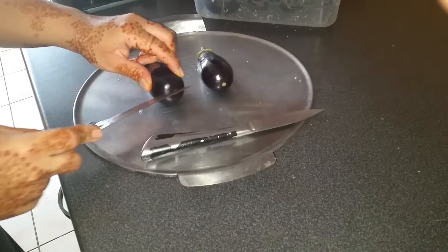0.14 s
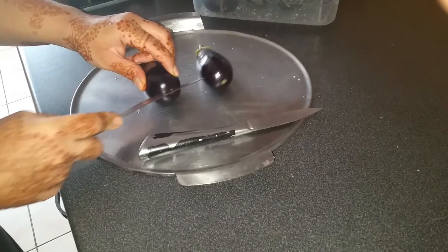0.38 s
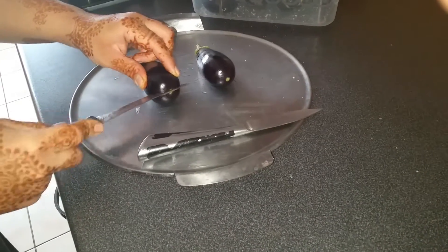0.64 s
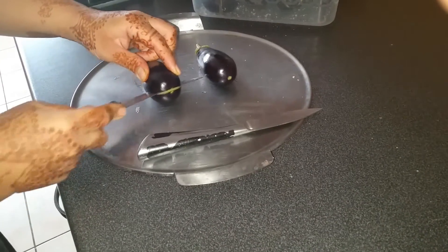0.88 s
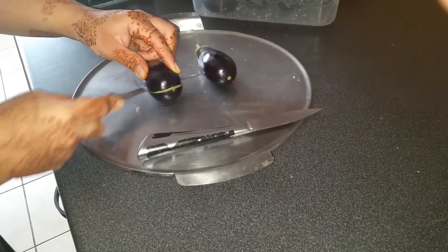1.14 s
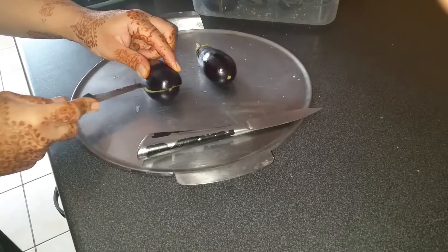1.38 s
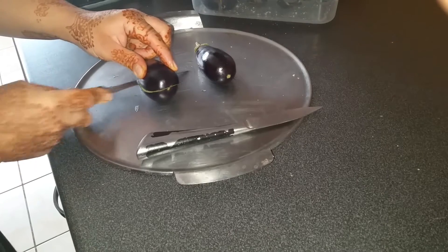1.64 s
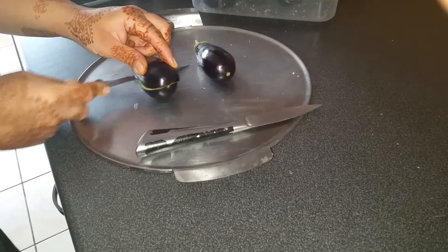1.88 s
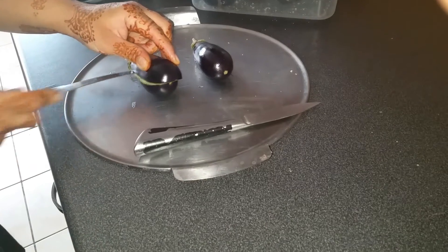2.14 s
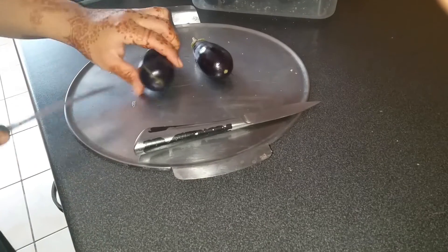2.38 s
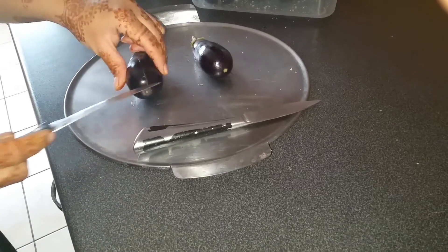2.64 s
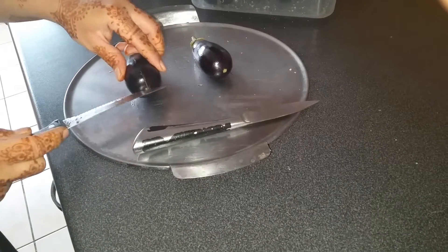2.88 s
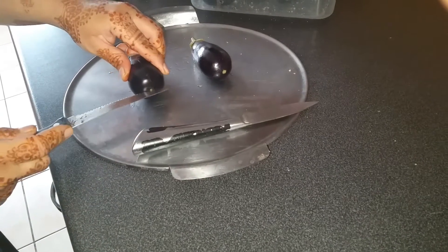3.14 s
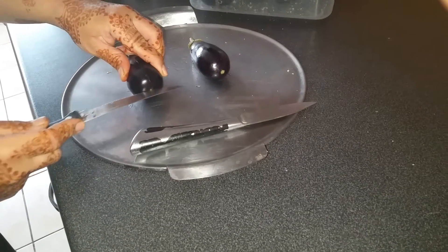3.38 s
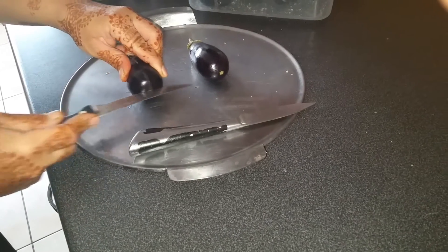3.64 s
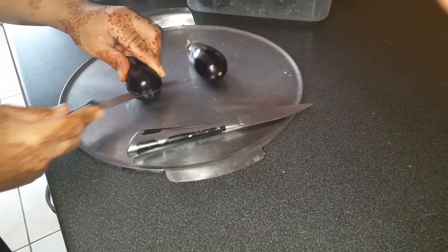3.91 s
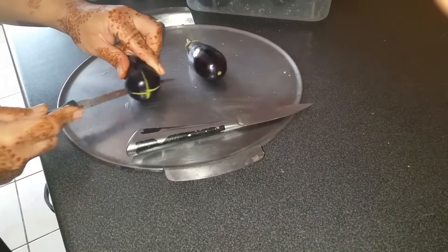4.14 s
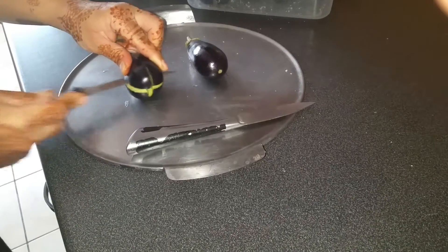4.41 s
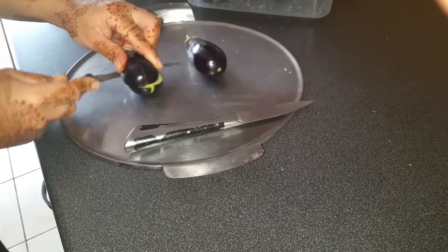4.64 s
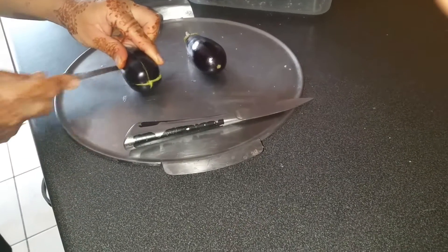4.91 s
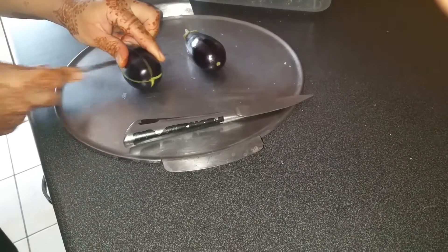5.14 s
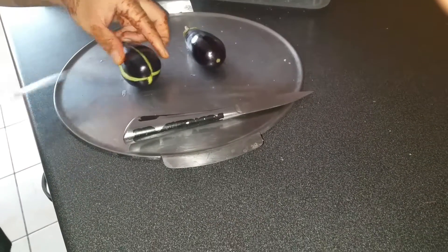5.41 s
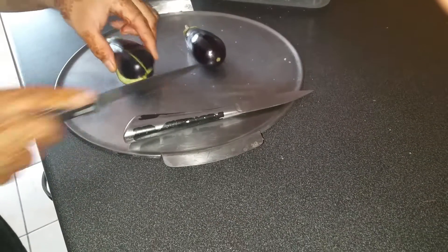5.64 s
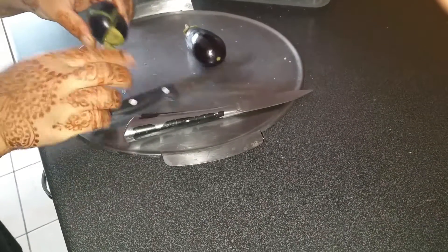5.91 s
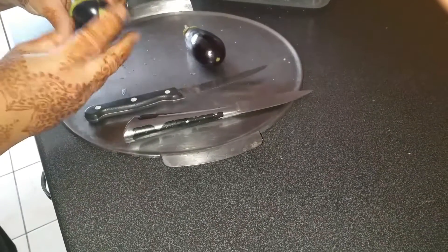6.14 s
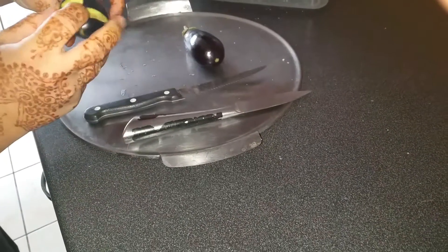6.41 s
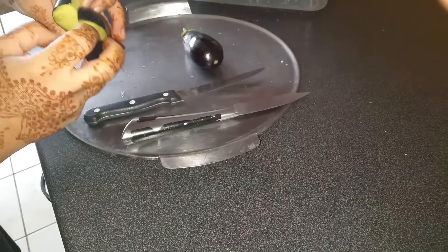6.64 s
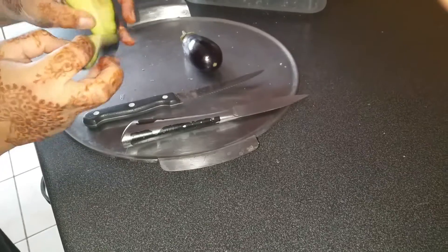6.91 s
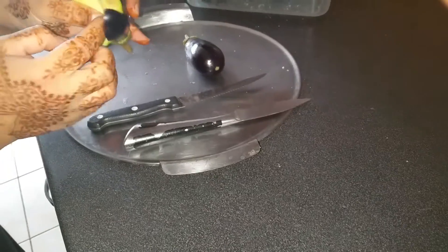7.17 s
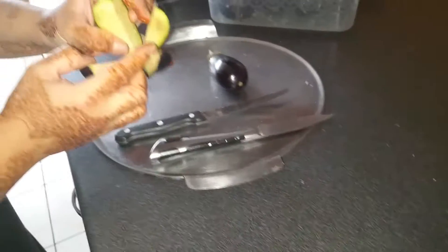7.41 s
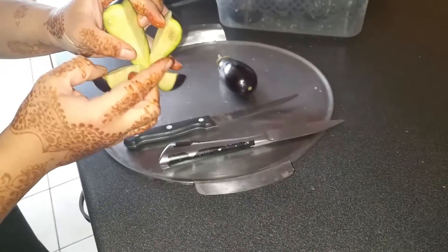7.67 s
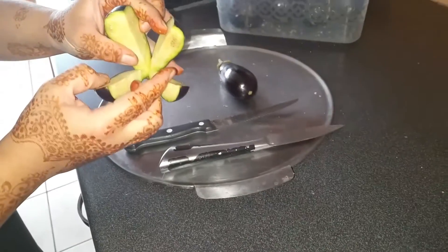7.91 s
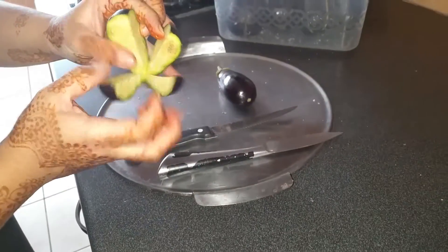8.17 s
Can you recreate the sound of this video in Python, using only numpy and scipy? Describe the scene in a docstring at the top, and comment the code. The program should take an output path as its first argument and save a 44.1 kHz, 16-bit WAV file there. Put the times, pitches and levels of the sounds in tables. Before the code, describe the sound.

Close in a quiet kitchen, a knife saws a small aubergine on a steel tray: quick alternating strokes, crackly and moist, with dull counter thumps. A short pause with a soft pop and rubbing fingers follows, then a second bout opens with loud snaps and saws on. The knife is dropped with a rapid bouncing metal clatter, leaving faint handling taps over low room tone and thin high buzzing.

```python
"""A knife saws twice through a small aubergine on a steel tray on a kitchen counter, then drops on the tray.
Each stroke is a crackle of clicks from tearing skin and flesh; short noisy blows make the snaps and clatter.
Soft presses ring the counter's low modes, some as a stroke ends; damped waves make taps and pops, some dry,
some ringing on in tray and room. Behind lie room tone made of noise, a low hum, tiny high ticks, and a faint
buzz of pulses and fuzzy noise."""
import sys
import numpy as np
from scipy import signal
from scipy.fft import rfft, irfft, next_fast_len
from scipy.io import wavfile
from scipy.ndimage import uniform_filter1d

SR = 44100
rng = np.random.default_rng(int(sys.argv[2]) if len(sys.argv) > 2 else 0)


def boost_factor(decibels):
    """Convert a level in decibels to a linear amplitude factor."""
    exponent = np.asarray(decibels, float) / 20
    return 10 ** exponent


def dump(signal):
    """Clip the signal to [-1, 1] and save it as 16-bit WAV at the path in sys.argv[1]."""
    limited = np.clip(np.atleast_2d(signal).T, -1, 1)
    pcm = np.round(limited * 32767).astype(np.int16)
    wavfile.write(sys.argv[1], SR, pcm)


N = 365588

# Room tone. Each row: frequency in Hz, relative level in dB per Hz.
AIR_COLOUR = [(22, -30), (38, 1.5), (49, -7), (124, -2), (291, -11.5), (348, -13), (1110, -17), (2600, -22),
              (4190, -25.5), (5670, -21), (7660, -24.5), (9140, -27.5), (9860, -27), (14400, -31.5),
              (15300, -32), (15800, -55)]
# How alike the room tone is on both sides. Each row: frequency in Hz, likeness (1 = same).
AIR_LIKENESS = [(60, 0.58), (240, 0.65), (950, 0.067), (3770, 0), (15000, 0)]
# Balance of the room tone. Each row: frequency in Hz, left over right in dB.
AIR_BALANCE = [(60, -5), (240, 1.5), (950, -1.0), (3770, -6), (15000, -7.5)]
# Hum without the knife. Each row: time in seconds, level in dB.
HUM_LEVEL = [(0, -86), (7.3, -88), (7.7, -75), (8.29, -66)]
# Colour of the buzz. Each row: centre in Hz, width in Hz, relative level in dB.
BUZZ_BANDS = [(5710, 700, 8.5), (5560, 270, -4.5), (8000, 650, -1.5)]
# Fuzzy part of the buzz. Each row: time in seconds, level in dB before the bursts shape it.
FUZZ_LEVEL = [(0, -78), (.7, -68), (2.4, -70), (3.1, -74), (3.25, -71), (5.4, -71), (6.4, -80), (8.29, -75)]
# Clear pulses of the buzz. Each row: time in seconds, level in dB before bursts and left-right balance.
PULSE_LEVEL = [(0, -81), (2.4, -72.5), (3.1, -85), (3.2, -74), (4.6, -73.5), (4.8, -103)]
# The pace of the bursts changes in steps. Each row: from this time in seconds, bursts a second.
BURST_PACE = [(0, 8.475), (2.36, 10), (2.76, 7.143), (3.18, 5.77), (3.7, 6.5)]
# Blade strokes, push and pull by turns. Each row: start in seconds, length in seconds,
# crackle in dB before colouring, body (low part) in dB against the crackle.
STROKES = [(0.161, 0.072, -57.5, -1), (0.354, .21, -52.5, 4), (0.631, 0.071, -49, 3.5),
           (0.777, 0.15, -48.5, 4.5), (1.011, .068, -49, 5.5), (1.149, 0.12, -45, -1),
           (1.375, 0.063, -46, 1.5), (1.511, 0.14, -47, 4), (1.761, 0.062, -46.5, 0),
           (1.922, 0.081, -42, -5), (2.118, 0.12, -48.5, -5), (3.606, 0.087, -59, 0),
           (3.788, 0.068, -50, -4), (3.959, .085, -43.5, 2.5), (4.146, 0.06, -44.5, 2),
           (4.282, .12, -48, 6), (4.489, 0.063, -43, -7.5), (4.624, 0.12, -47.5, 5.5),
           (4.843, 0.083, -44.5, -13), (4.986, 0.14, -47, -0.5), (5.232, 0.11, -44.5, -4.5)]
# Fingers rub the fruit. Each row: start in seconds, length in seconds, level in dB before colouring.
RUBS = [(2.3, 0.28, -70), (3.38, 0.19, -72.5), (5.616, 0.17, -71.5), (6.485, .03, -74), (6.788, 0.031, -74),
        (8.214, 0.034, -75.5)]
# Loud snaps of skin and fibre. Each row: time in seconds, level in dB before a shared gain,
# body (low part) and edge (high part) in dB against the middle.
SNAPS = [(0.5164, -30, -7, -16), (0.559, -34, 6, 1.5), (0.7337, -34.5, 1, -4), (0.8295, -40, 18, -10),
         (0.8923, -34.5, 22.5, -11), (1.6409, -29.5, -23, 7.5), (3.5838, -43, 4, -2),
         (3.6358, -36.5, -1.5, -17), (3.6957, -38, 3, -14), (3.9714, -31, 10, 8.5), (3.983, -25, -11, -4),
         (3.9914, -18.5, -3, -9), (4.0026, -29, -18, 10), (4.0202, -18.5, 5, 5), (4.076, -40, -10, -20),
         (4.6977, -21, -27, -26)]
# Colour of torn fruit. Each row: frequency in Hz, relative level in dB per Hz.
FRUIT_COLOUR = [(120, -23), (200, -6), (300, -6), (560, -3.5), (760, -5), (950, 1), (1170, -3),
                (1600, -1.3), (2100, 0.5), (2800, -8), (3500, -6.5), (4500, -7), (6500, -13.5),
                (9300, -20.5), (12000, -21), (15500, -36)]
# Clear modes of the tray. Each row: frequency in Hz, relative level in dB, time to fall 60 dB in seconds.
TRAY_MODES = [(590, -6, .25), (840, -6, .15), (980, -5, .15), (1330, -9, .2), (1612, -7, .2),
              (1776, -5, .25), (1960, -2, .2), (2020, -3, .2), (2290, -5, .2), (2454, -4, .2),
              (2834, -7, .2), (3320, -9, .15), (4312, -6, .12), (5224, -6, .08), (5726, -6, .08),
              (7079, -7, .08)]
# Echo of the kitchen. Each row: frequency in Hz, time to fall 60 dB in seconds.
KITCHEN_DECAY = [(100, 0.47), (500, 0.4), (2000, 0.43), (6000, 0.32), (14000, 0.19)]
# How alike the tray and kitchen tails are on both sides. Each row: frequency in Hz, likeness (1 = same).
NEAR_LIKENESS = [(60, 1), (240, 0.95), (950, 0.53), (3770, -0.1), (15000, 0.087)]
# Balance of those tails. Each row: frequency in Hz, left over right in dB.
NEAR_BALANCE = [(60, -22), (180, -6), (550, 3), (1650, -8.5), (4970, -4.5), (15000, 5)]
# The hand presses tray onto counter. Each row: time in seconds (a press starts 6 ms later),
# strength in dB for the lowest modes, extra strength in dB for the upper modes.
PRESSES = [(0.177, -55.5, 20), (0.663, -49, -12), (0.871, -45, -10), (1.029, -65, -10), (1.231, -46, -17),
           (1.4, -44.5, -3), (1.612, -36.5, -12), (2.004, -32, 4.5), (3.417, -59, 10.5), (3.804, -47, 13.5),
           (3.99, -35, -2), (4.397, -31.5, 5.5), (4.745, -29.5, 3), (5.281, -44, -7), (5.86, -55, -4),
           (5.989, -42, 11), (6.081, -42, 14)]
# Low modes of the counter. Each row: frequency in Hz, level in dB before a shared cut,
# time to fall 60 dB in seconds.
COUNTER_MODES = [(59, -20.5, 1), (82.8, -1.5, 0.47), (105.5, -6.5, 0.78), (124.3, -10.5, 0.16),
                 (142.9, -10.5, 0.74), (162.4, -24, 0.23), (175, -14, 0.54), (207, -49, 0.27),
                 (253.4, -13.5, 0.35)]
# Taps and pops of fruit, fingers and handle, some dry, some ringing on in tray and room. Each row:
# start in seconds, level in dB, pitch in Hz, left over right in dB, share sent into the tray in dB.
TAPS = [(2.517, -36, 345, -1, -5), (2.765, -55, 450, 13, -.5), (2.984, -59, 3730, 4, 7),
        (3.447, -47.5, 660, 16, -25), (5.896, -48.5, 705, 2, 6), (6.595, -58.5, 1490, 2, 1),
        (6.86, -46.5, 6090, -11, -16), (7.377, -57, 2510, -2.5, -1.5), (7.43, -33.5, 1650, 18, -29),
        (8.05, -61, 1004, -6.5, -1)]
# The knife lands and bounces. Each row: time in seconds, level in dB before a shared gain,
# body (low part) and edge (high part) in dB against the middle.
BOUNCES = [(5.9554, -17, -13, -5), (5.9893, -19.5, -7, 2), (5.998, -18.5, 1.5, -0.5),
           (6.0124, -26, -8, -0.5), (6.053, -33, -7.5, -7.5), (6.0768, -19.5, -10, -2),
           (6.093, -30.5, 5, 3.5), (6.1232, -28, -3, 0.5)]
# Colour of steel on steel. Each row: frequency in Hz, relative level in dB per Hz.
STEEL_COLOUR = [(90, -29), (150, -20), (250, -6), (500, -4.5), (840, 2), (1200, -6.5), (2000, 0),
                (3000, -2.5), (4500, -4.5), (7000, -5.5), (10000, -11), (14000, -16), (16000, -47)]
# Modes of the blade. Each row: frequency in Hz, relative level in dB, time to fall 60 dB in seconds.
BLADE_MODES = [(800, -6, .03), (2550, 0, .03), (3700, -5, .025), (4650, -2, .03), (5300, -5, .03),
               (7080, -8, .04)]

AIR_DB = -65
BODY_BELOW_HZ, EDGE_ABOVE_HZ = 1200, 3500
# Swells: a rise time in seconds or a share of the stroke, a power that bends the rise, a fall.
PUSH_RISE_S, PUSH_STEEP = 0.015, 2
PULL_RISE_SHARE, PULL_STEEP = 0.51, 1.6
RUB_RISE_S, RUB_STEEP = 0.018, 2
STROKE_FALL_DB_PER_S, RUB_FALL_DB_PER_S = -450, -150
PUSH_EDGE_DB, PULL_EDGE_DB = -0.1, -1.5
EDGE_PER_BODY = 0.22  # a stroke with more body also has more edge
RUB_BODY_DB, RUB_EDGE_DB = 3.5, 2
# Each push bites in with a snap; its level is set from the crackle, before the snaps' shared gain.
BITE_DB, BITE_BODY_DB, BITE_EDGE_DB = 12, -6, -19
FRUIT_PAN_DB, KNIFE_PAN_DB = 2, -1.5  # left over right
PRESS_S = 0.0038
TAP_CYCLES, TAP_SLOPE = 0.34, 0.13  # cycles to the peak at 1 kHz, more for higher taps
OFFSET = -0.0005


def evened(x):
    """Scales a signal to an average (rms) level of 1."""
    return x / np.sqrt(np.mean(x ** 2) + 1e-20)


def read(points, hz):
    """Reads a table between its rows, on a logarithmic frequency scale."""
    f, value = np.transpose(points)
    return np.interp(np.log(hz + 1), np.log(f + 1), value)


def drifting(width):
    """Slow random drift: noise averaged over width samples, rms 1."""
    return evened(uniform_filter1d(rng.standard_normal(N), width))


def pair(size, length, likeness, balance, shape_db):
    """Two-channel noise from random short-time spectra; shape_db(hz, s) gives the level."""
    hop = size // 4
    frames, hz = length // hop + 5, np.fft.rfftfreq(size, 1 / SR)[:, None]
    a, b, c, d = rng.standard_normal((frames, len(hz), 4)).T
    shared, separate = a + 1j * b, c + 1j * d
    like = np.clip(read(likeness, hz), -1, 1)
    half = boost_factor(read(balance, hz) / 2)
    left = shared * half
    right = (like * shared + np.sqrt(1 - like ** 2) * separate) / half
    z = np.array([left, right]) * boost_factor(shape_db(hz, np.arange(frames) * hop / SR))
    return signal.istft(z, nperseg=size, noverlap=size - hop)[1][:, :length]


def air():
    """Room tone: coloured noise with a slow drift in the bass."""
    def shape_db(hz, s):
        drift = evened(uniform_filter1d(rng.standard_normal(len(s)), 12))
        return read(AIR_COLOUR, hz) + 1.5 * drift / (1 + hz / 400)

    return boost_factor(AIR_DB) * evened(pair(2048, N, AIR_LIKENESS, AIR_BALANCE, shape_db))


def hum(level):
    """One low mode of the counter hums unevenly while the knife works or fingers rub, and again at the end."""
    t = np.arange(N) / SR
    noise = rng.standard_normal((N, 2)) @ [1, 1j]
    wander = signal.lfilter([1], [1, -np.exp(-np.pi * 9 / SR)], noise)  # about 9 Hz wide
    tone = evened((wander * np.exp(2j * np.pi * 143 * t)).real)
    from_strokes = boost_factor(-13) * uniform_filter1d(level[0, 0], size=9000)
    return tone * (from_strokes + boost_factor(np.interp(t, *np.transpose(HUM_LEVEL))))


def buzz_power(hz):
    """Strength of the buzz at each frequency: a sum of smooth bands."""
    return sum(boost_factor(2 * db) / (1 + ((hz - f) / width * 2) ** 4) for f, width, db in BUZZ_BANDS)


def buzz():
    """A faint high buzz, probably an insect: fast regular pulses and a fuzzy band, in bursts with short gaps."""
    t = np.arange(N) / SR
    starts, rates = np.transpose(BURST_PACE)
    turns = np.cumsum(rates[np.searchsorted(starts, t, "right") - 1]) / SR
    on = uniform_filter1d(1. * (turns % 1 < 0.78), size=200)

    fuzz = evened(pair(1024, N, AIR_LIKENESS, AIR_BALANCE,
                       lambda hz, s: 10 * np.log10(buzz_power(hz)) + 0 * s))
    fuzz = fuzz * (0.8 + 0.23 * on)  # the fuzz only dips in the gaps
    fuzz = fuzz * boost_factor(np.interp(t, *np.transpose(FUZZ_LEVEL)))

    wobble = evened(uniform_filter1d(uniform_filter1d(rng.standard_normal(N), size=9000), size=9000))
    pulse_hz = 230 * (1 + 0.006 * wobble)
    phase = 2 * np.pi * np.cumsum(pulse_hz) / SR
    # aligned overtones add up to sharp pulses; their colour sits 200 Hz above that of the fuzz
    pulses = sum(np.sqrt(buzz_power(k * pulse_hz.mean() - 200)) * np.cos(k * phase) for k in range(22, 40))
    pulse_db = np.interp(t, *np.transpose(PULSE_LEVEL)) + np.array([[-2.5], [2.5]])
    return fuzz + evened(pulses) * on * boost_factor(pulse_db)


def ticking():
    """Tiny uneven ticks high in the treble, and a thin wavering tone among them, stronger on the left."""
    t, u = np.arange(N) / SR, np.arange(130) / SR
    turns = np.cumsum(57 * boost_factor(0.9 * drifting(500))) / SR  # about 57 ticks a second
    train = np.diff(np.floor(turns), prepend=0) * boost_factor(2.8 * rng.standard_normal(N))
    tick = np.hanning(len(u)) * (np.sin(2 * np.pi * 8500 * u) + 0.2 * np.sin(2 * np.pi * 5600 * u))
    ticks = boost_factor(-66) * signal.oaconvolve(train, tick)[:N]
    tone = boost_factor(-82) * np.sin(2 * np.pi * 9290 * t + 1.5 * drifting(900))
    return np.array([[1], [0.3]]) * (ticks + tone)


def strokes():
    """Level of body, middle and edge: each stroke or rub swells, holds and lets go; pulls swell by their length."""
    t, level = np.arange(N) / SR, np.zeros((3, 1, N))
    rows = [(s, length, db, RUB_RISE_S, RUB_STEEP, RUB_FALL_DB_PER_S, RUB_BODY_DB, RUB_EDGE_DB)
            for s, length, db in RUBS]
    for k, (s, length, db, body_db) in enumerate(STROKES):
        if k % 2:  # pull
            rise, steep, edge_db = PULL_RISE_SHARE * length, PULL_STEEP, PULL_EDGE_DB
        else:
            rise, steep, edge_db = PUSH_RISE_S, PUSH_STEEP, PUSH_EDGE_DB
        edge_db += EDGE_PER_BODY * body_db
        rows.append((s, length, db, rise, steep, STROKE_FALL_DB_PER_S, body_db, edge_db))
    for s, length, db, rise, steep, fall_db, body_db, edge_db in rows:
        swell = np.clip((t - s) / max(rise, 0.004), 0, 1) ** steep
        fall = boost_factor(fall_db * np.clip(t - s - length, 0, 1))
        level[:, 0] += np.outer(boost_factor(db + np.array([body_db, 0, edge_db])), swell * fall)
    return level


def blows(rows, gain_db, pan_db, rattle_s):
    """Trains of blows, each with a short decaying rattle behind the first contact."""
    out = np.zeros((3, 2, N))
    chance = rng.standard_normal((len(rows), 900))
    fade = np.exp(-np.arange(900) / SR / max(rattle_s, 1e-5))
    for (s, db, body_db, edge_db), rattle in zip(rows, chance):
        jolts = np.r_[8, rattle * fade]
        jolts = jolts / np.linalg.norm(jolts)
        level = boost_factor(db + gain_db + np.add.outer([body_db, 0, edge_db], [pan_db / 2, -pan_db / 2]))
        start = round(s * SR)
        out[..., start:start + len(jolts)] += level[..., None] * jolts
    return out


def causal(gain_db):
    """Shortest click with this colour (minimum phase), energy 1."""
    log = np.log(boost_factor(np.maximum(gain_db, -100)))
    mirrored = np.r_[log, log[-2:0:-1]]
    click = np.fft.ifft(np.exp(np.conj(signal.hilbert(mirrored)))).real[:1024]
    return click / np.linalg.norm(click)


def coloured(trains, spectrum, bottom_hz):
    """Joins body, middle and edge parts and gives them the colour of the material."""
    size = next_fast_len(N)
    hz = np.fft.rfftfreq(size, 1 / SR) + 1
    # the body reaches down to bottom_hz; below that the middle part takes over
    low = 1 / (1 + (hz / BODY_BELOW_HZ) ** 4) / (1 + (bottom_hz / hz) ** 4)
    high = 1 / (1 + (EDGE_ABOVE_HZ / hz) ** 4)
    parts = (low, 1 - low - high, high)
    joined = irfft(sum(part * rfft(x, size) for part, x in zip(parts, trains)))[:, :N]
    click = causal(read(spectrum, np.fft.rfftfreq(4096, 1 / SR)))
    return signal.oaconvolve(joined, click[None], axes=1)[:, :N]


def modes(table, seconds, spread):
    """Decaying sines; spread sets how much their phase differs between the two microphones."""
    t = np.arange(round(seconds * SR)) / SR
    turn = spread * rng.uniform(-np.pi, np.pi, (len(table), 2, 1))
    return sum(boost_factor(db - 60 * t / t60) * np.sin(2 * np.pi * hz * t + p) for (hz, db, t60), p in zip(table, turn))


def flat(h):
    """A response of energy 1 a side, on average, whose broad colour is even."""
    z = rfft(h)
    z = z / np.sqrt(uniform_filter1d((abs(z) ** 2).mean(0), size=120))
    start = irfft(z)[:, :h.shape[1] * 4 // 5]
    return evened(start) / np.sqrt(start.shape[1])


def heard(x, direct_db, sheet_db, sheet_t60, ring_db, room_db, count):
    """Direct sound (count samples later on the right), the sheet's shiver and clear modes, the kitchen's tail."""
    t = np.arange(SR // 2) / SR
    out = boost_factor(direct_db) * np.array([x[0], np.roll(x[1], count)])
    middle = x.mean(0)[None]
    ring = modes(TRAY_MODES, 0.45, 0.66)
    for k in range(3):  # three random tails take turns, which evens out their colour
        sheet = pair(256, len(t), NEAR_LIKENESS, NEAR_BALANCE, lambda hz, s: 0 * hz) * boost_factor(-60 * t / sheet_t60)
        room = pair(256, len(t), NEAR_LIKENESS, NEAR_BALANCE,
                    lambda hz, s: -60 * s / read(KITCHEN_DECAY, hz))
        room = room * (1 - np.exp(-t / 0.0026))  # the echo builds up over a few milliseconds
        window = np.sqrt(2 / 3) * np.cos(2 * np.pi * (np.arange(N) / SR * 9 + k / 3))
        tail = boost_factor(sheet_db) * flat(sheet) + boost_factor(room_db) * flat(room)
        out = out + signal.oaconvolve(middle * window, tail, axes=1)[:, :N]
    return out + boost_factor(ring_db) * signal.oaconvolve(middle, ring / np.linalg.norm(ring[0]), axes=1)[:, :N]


def sawing(level):
    """Fibres tear as dense uneven clicks in clumps, with louder single snaps; finger rubs share the crackle."""
    clumps = boost_factor(1.63 * drifting(260))  # a few milliseconds each
    sizes = boost_factor(3.5 * np.minimum(rng.exponential(1, N), 4))
    tears = (rng.random(N) < 2500 / SR) * rng.choice([-1, 1], N) * sizes  # about 2500 a second
    hiss = rng.standard_normal(N)  # wet blade sliding in flesh
    drive = evened(clumps * (evened(tears) + 0.71 * hiss)) * boost_factor(np.array([[-1.5], [1.5]]))
    tearing = coloured(level * drive, FRUIT_COLOUR, bottom_hz=640)
    tearing = heard(tearing, direct_db=-6, sheet_db=0, sheet_t60=0.024, ring_db=-15, room_db=-2.5, count=3)

    bites = [(s + PUSH_RISE_S, db + BITE_DB, BITE_BODY_DB, BITE_EDGE_DB) for s, _, db, _ in STROKES[::2]]
    snaps = blows(SNAPS + bites, gain_db=11, pan_db=FRUIT_PAN_DB, rattle_s=0.00083)
    snaps = coloured(snaps, FRUIT_COLOUR, bottom_hz=390)
    snaps = heard(snaps, direct_db=-7, sheet_db=-0.5, sheet_t60=0.016, ring_db=-16, room_db=-4.5, count=3)
    return tearing + snaps


def thumps(level):
    """Soft presses and the drag of strokes and rubs ring the counter's low modes, almost alike on both sides."""
    push, t = np.zeros((2, N)), np.arange(SR) / SR  # one push for the lowest modes, one for the upper
    bump = np.hanning(max(round(PRESS_S * SR), 8))
    for s, db, upper_db in PRESSES:
        strength = boost_factor(np.array([db, db + upper_db]))
        push[:, round((s + 0.006) * SR):][:, :len(bump)] += np.outer(strength, bump / bump.sum())
    push += boost_factor(-34.5) * level[0] * rng.standard_normal(N)  # drag
    out = 0
    for hz, db, t60 in COUNTER_MODES:  # all modes start near their crest
        ring = boost_factor(db - 4.5 - 60 * t / t60) * np.cos(2 * np.pi * hz * t + rng.normal(0, 0.12, (2, 1)))
        out = out + signal.oaconvolve(push[int(hz > 115)][None], ring, axes=1)[:, :N]
    low_cut = signal.butter(2, 45, "high", fs=SR)
    return signal.filtfilt(*low_cut, out) * boost_factor(np.array([[-0.8], [0.8]]))


def taps():
    """Damped blows of a few short waves; a share of each passes into tray and room."""
    out, t = np.zeros((2, 2, N)), np.arange(1300) / SR
    for s, db, hz, pan_db, tray_db in TAPS:
        u = t * hz / max(TAP_CYCLES * (hz / 1000) ** TAP_SLOPE, 0.15)
        swell = (np.e * u) ** 2 * np.exp(-2 * u)  # peaks at 1 where u is 1
        tap = swell * np.cos(2 * np.pi * hz * t)
        level = boost_factor(db + np.add.outer([0, tray_db], [pan_db / 2, -pan_db / 2]))
        out[..., round(s * SR):round(s * SR) + len(t)] += level[..., None] * tap
    direct, into_tray = out
    return direct + heard(into_tray, direct_db=-43, sheet_db=8, sheet_t60=0.066, ring_db=-6, room_db=-2, count=0)


def clatter():
    """Steel on steel: the blade rings briefly, the tray and the room answer strongly."""
    hits = blows(BOUNCES, gain_db=23, pan_db=KNIFE_PAN_DB, rattle_s=0.0021)
    hits = coloured(hits, STEEL_COLOUR, bottom_hz=30)
    ring = modes(BLADE_MODES, 0.12, 0.69)
    blade = boost_factor(-9) * signal.oaconvolve(hits, ring / np.linalg.norm(ring[0]), axes=1)[:, :N]
    return blade + heard(hits, direct_db=-5, sheet_db=-2, sheet_t60=0.037, ring_db=-10.5, room_db=-1, count=9)


def scene():
    """All sources summed at the two microphones."""
    level = strokes()
    background = air() + hum(level) + buzz() + ticking()
    return background + sawing(level) + thumps(level) + taps() + clatter()


def roll_off(x):
    """The treble ends steeply here."""
    return signal.sosfilt(signal.butter(12, 16500, fs=SR, output="sos"), x)


def record(dry):
    """Adds the small steady offset of the converter to finish the mix."""
    mix = dry + OFFSET
    return roll_off(mix)


dry = scene()
out = record(dry)
dump(out)
```